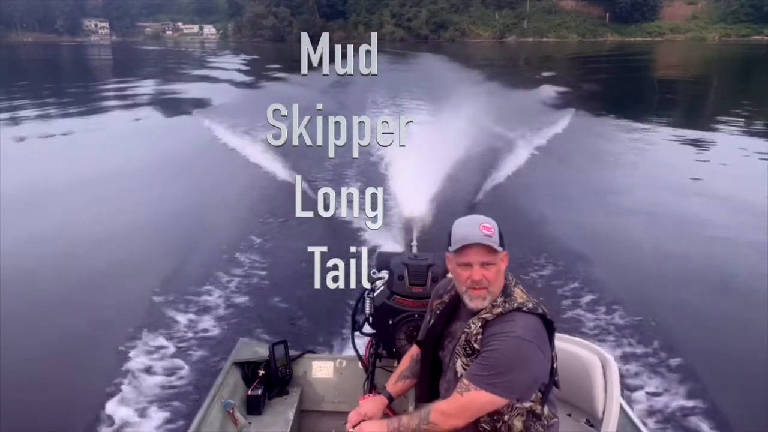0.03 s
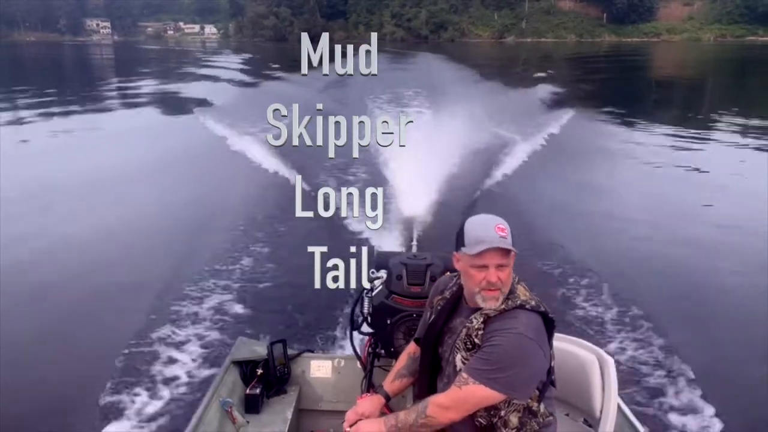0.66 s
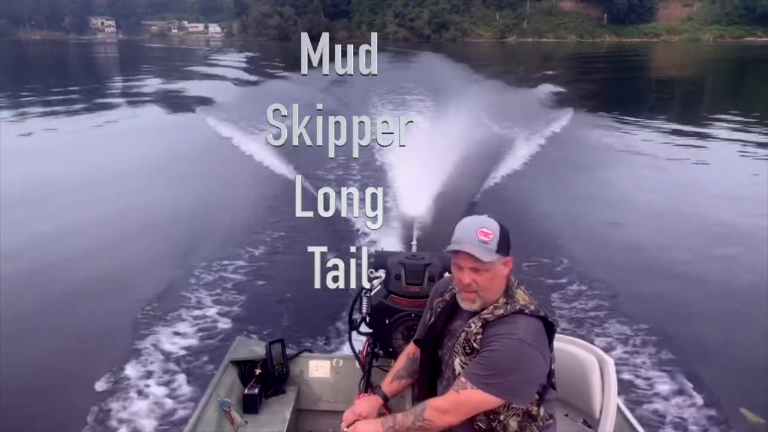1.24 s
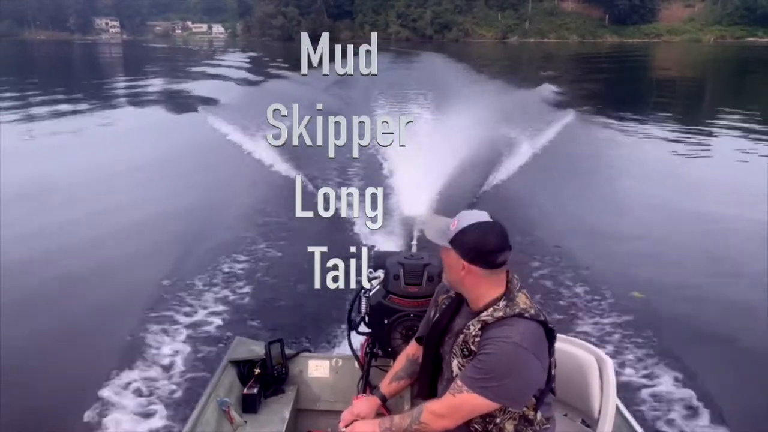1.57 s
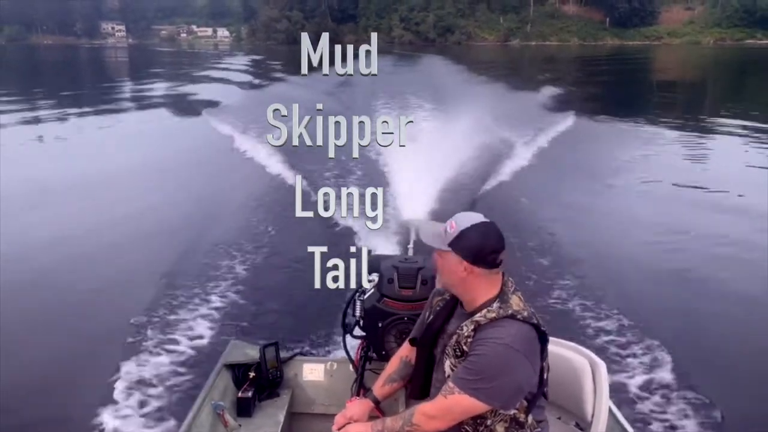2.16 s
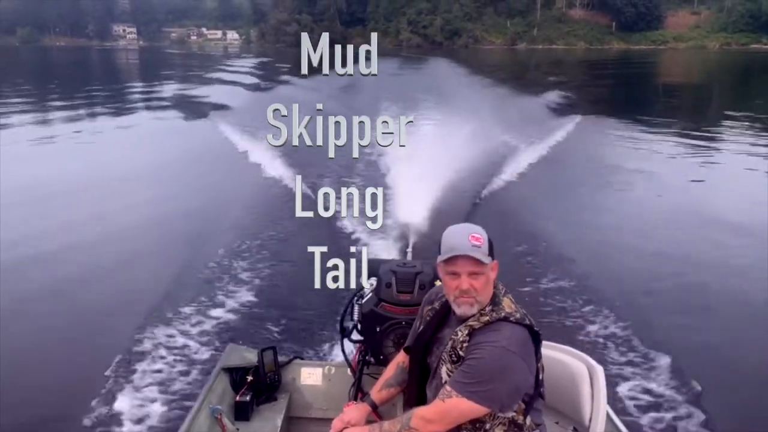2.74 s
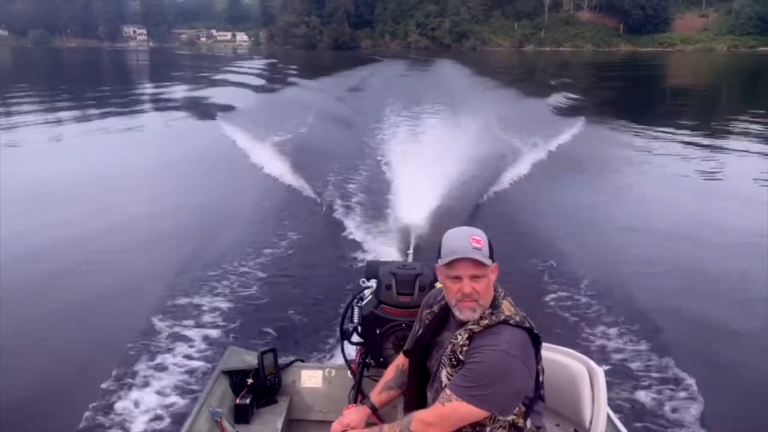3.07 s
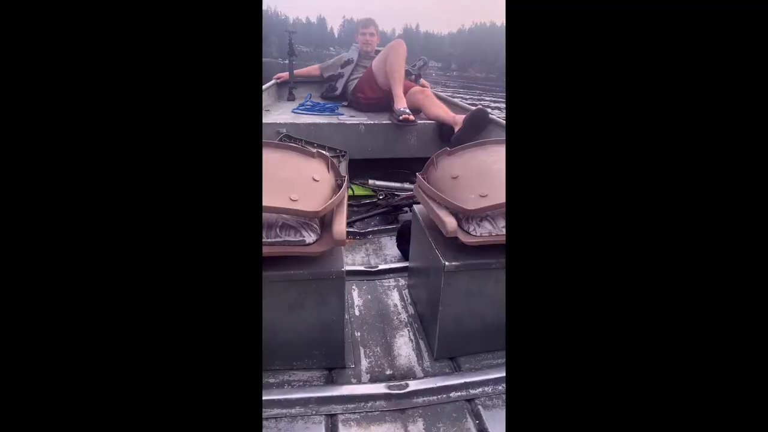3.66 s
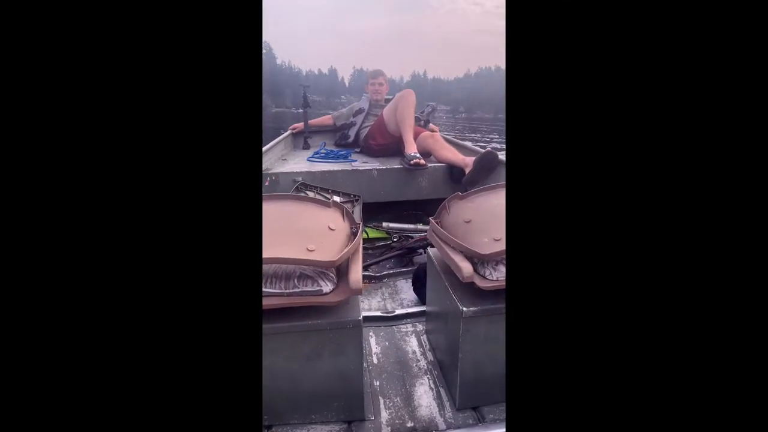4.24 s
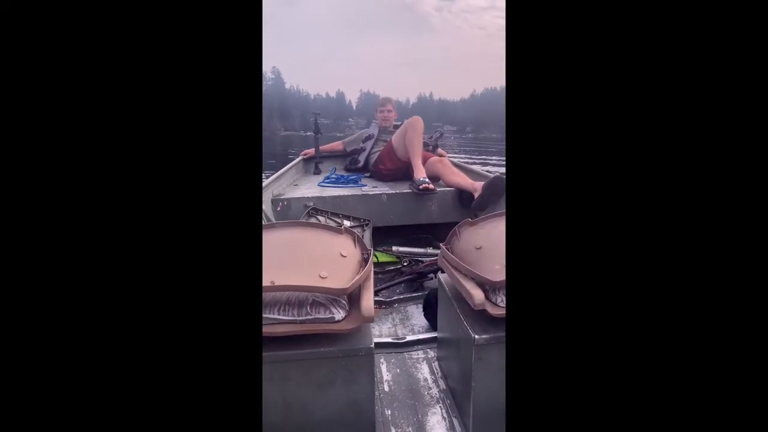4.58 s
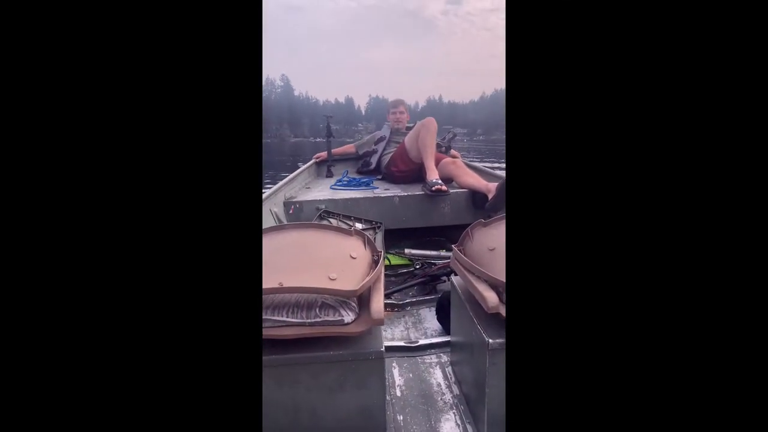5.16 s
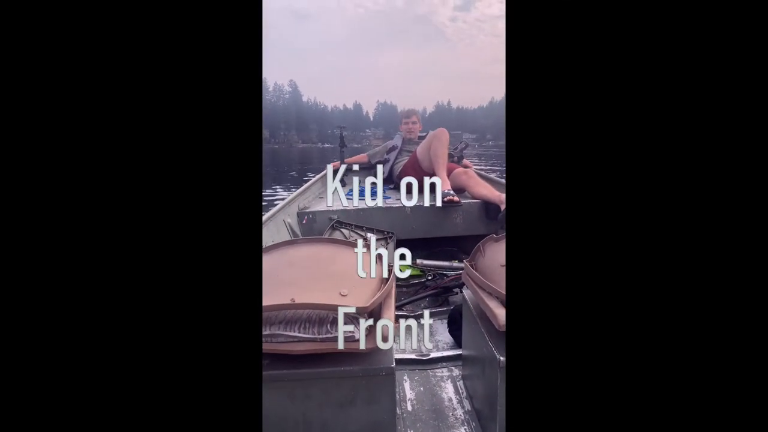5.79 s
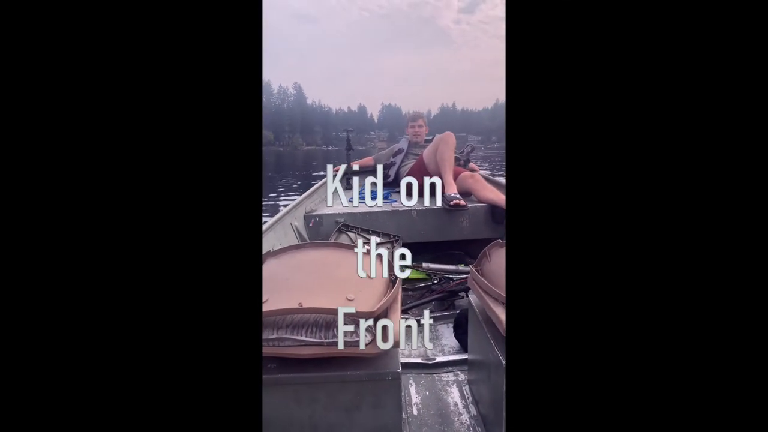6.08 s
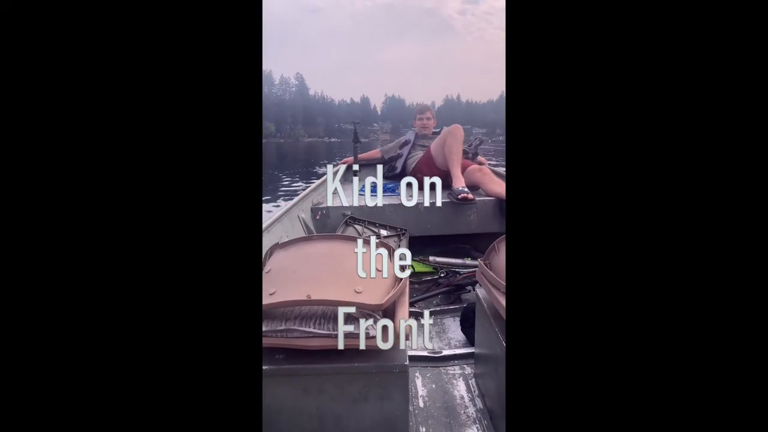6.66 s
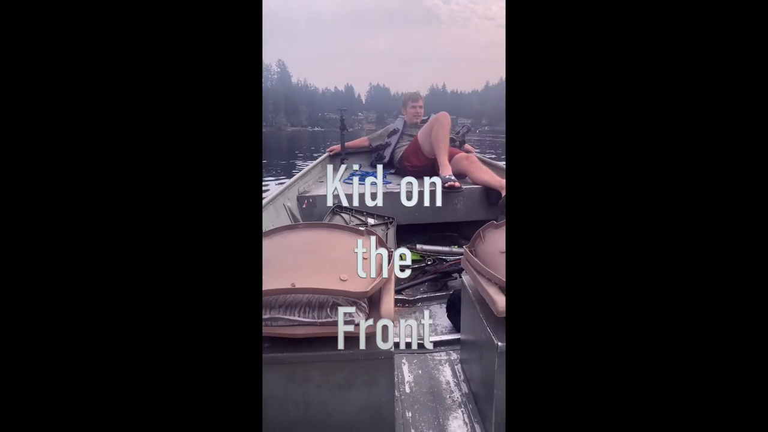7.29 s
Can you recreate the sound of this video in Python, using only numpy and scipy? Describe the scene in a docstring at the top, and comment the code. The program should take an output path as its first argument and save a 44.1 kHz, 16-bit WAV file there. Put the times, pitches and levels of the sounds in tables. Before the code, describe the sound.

A small petrol motor pushes an aluminium boat across a lake, heard from on board. From the start it runs at a steady speed, with a low exhaust drone, metallic clatter, a faint shaft whine and rushing spray. At about 3.3 seconds the hull gives one sharp thump; the level dips briefly and a faint tick follows. At about 3.6 seconds the sound switches abruptly to a louder, faster run, higher in pitch and with a brighter hiss, settling slightly after half a second. Ripples slap the hull dully at uneven intervals, the propeller shaft knocks in its tube and the roar churns, swelling and sinking. A hull panel booms, most strongly around 6.2 and 7.2 seconds. Between 6.5 and 6.9 seconds a loose fitting gives three faint, high squeaks. The motor runs on until the end, at about 7.4 seconds.

```python
"""A long-tail mud motor drives a small aluminium boat across a lake. First the microphone faces aft:
spray rushes, the engine clatters and the exhaust drones on multiples of the cycle rate (one cycle is
two turns of the crank). Near 3.3 s the hull thumps, the level dips briefly and a faint tick follows.
Near 3.6 s the scene cuts to a louder, faster run, facing the bow: ripples slap the hull, a panel booms,
the shaft knocks in its tube and the roar churns. Towards the end a loose fitting squeaks."""
import sys
import numpy as np
from scipy import signal
from scipy.fft import rfft, irfft, next_fast_len
from scipy.io import wavfile
from scipy.ndimage import uniform_filter1d, map_coordinates

SR = 44100
rng = np.random.default_rng(int(sys.argv[2]) if len(sys.argv) > 2 else 0)


def generate_wav(sig):
    """Save sig (samples, or channels by samples) to the path in sys.argv[1] as 16-bit PCM at SR."""
    pcm = np.round(np.clip(np.atleast_2d(sig).T, -1, 1) * 32767).astype(np.int16)
    wavfile.write(sys.argv[1], SR, pcm)


N = 327219
T = np.arange(N) / SR
THUMP_S, CUT_S = 3.284, 3.585


def amp(db):
    """Amplitude ratio: a factor of ten for every 20 dB."""
    return 10 ** (np.asarray(db) / 20)

def unit(x):
    """Normalisation to an rms of 1."""
    return x / np.sqrt(np.mean(x ** 2) + 1e-20)

def along(rows, hz):
    """Interpolation of a table's columns on a logarithmic frequency axis."""
    row_hz, *columns = np.transpose(rows)
    return [np.interp(np.log(hz + 1), np.log(row_hz + 1), column) for column in columns]

def contour(rows):
    """Linear interpolation of (time [s], level [dB]) rows at every sample."""
    return np.interp(T, *np.transpose(rows))

def wobble(rate):
    """Smooth random modulation: a spline through `rate` Gaussian knots a second."""
    coarse = T[::64]
    knots = rng.standard_normal(int(T[-1] * rate) + 4)
    return np.interp(T, coarse, map_coordinates(knots, [coarse * rate]))

def filtered(x, response):
    """Linear filtering: the spectrum is multiplied by a complex frequency response."""
    size = next_fast_len(N + SR // 4, real=True)
    return irfft(rfft(x, size) * response(np.fft.rfftfreq(size, 1 / SR)), size)[..., :N]

def lowpass(x, edge_hz, order=8):
    """Zero-phase low-pass filtering, with half amplitude at the edge."""
    return filtered(x, lambda hz: 1 / (1 + (hz / edge_hz) ** order))

def ringing(x, modes):
    """Modal superposition: x drives damped resonances of alternating polarity."""
    return filtered(x, lambda hz: sum(
        (-1) ** k * amp(db) * 1j * hz * width / (centre ** 2 - hz ** 2 + 1j * hz * width)
        for k, (centre, width, db) in enumerate(modes)))

def patchy(x, depth_db):
    """Bandwise amplitude modulation, in patches some 250 Hz wide and 60 ms long."""
    spectra = signal.stft(x, nperseg=512)[2]
    field = uniform_filter1d(rng.standard_normal(spectra.shape), size=3, axis=1)
    field = uniform_filter1d(field, size=11, axis=2)
    return signal.istft(spectra * unit(amp(depth_db * unit(field))), nperseg=512)[1][:, :N]

def knocks(cycle, places, jitter_s, scatter_db=2.0):
    """A quasi-periodic impulse train: blows recur each cycle, a little off in time and size."""
    place, db = np.transpose(places)
    due = np.arange(int(cycle[-1]) + 1)[:, None] + place
    late, size = rng.standard_normal((2, *due.shape))
    sample = (np.interp(due, cycle, T, right=T[-1] + 1) + jitter_s * late) * SR
    heard = (sample > 0) & (sample < N - 1)
    return unit(np.bincount(np.rint(sample[heard]).astype(int), amp(db + scatter_db * size)[heard], N))

def wash(cycle, spectrum, rattle_share, jitter_s, throb_db, flutter_db):
    """Incoherent sources add in power: two streams of water rush and rattle, swelling once a cycle."""
    # loose parts are strongest in mid-spectrum: (frequency [Hz], power weight [0-1])
    weights = [(150, 0.094), (450, 0.94), (2800, 0.72), (7000, 0.56)]
    share = lambda hz: np.clip(rattle_share * along(weights, hz)[0], 0, 1)
    loose_parts = lambda count: np.column_stack([rng.random(count), rng.normal(0, 1.95, count)])
    blows = np.array([knocks(cycle, loose_parts(count=56), jitter_s) for _ in range(2)])
    rattle = filtered(blows, lambda hz: np.sqrt(share(hz)))
    rush = filtered(rng.standard_normal((2, N)), lambda hz: np.sqrt(1 - share(hz)))
    firing = np.cos(np.pi * cycle) ** 8
    swell = unit(amp(throb_db * firing + flutter_db * wobble(90)))
    return filtered((rattle + rush) * swell, lambda hz: amp(along(spectrum, hz)[0]) * np.sqrt(SR / 2))

def hull_echoes(x, strength, count=12, reach_s=.012):
    """Comb filtering: the bare aluminium sides return weak early copies of each stream."""
    taps = np.zeros((2, int(SR * reach_s) + 100))
    for row in taps:
        row[rng.integers(30, len(row), count)] = strength * rng.choice([-1, 1], count) / np.sqrt(count)
    taps[:, 0] = 1
    return signal.fftconvolve(x, taps / np.linalg.norm(taps, axis=1, keepdims=True), axes=1)[:, :N]

def clatter(noise, echo, lump_db):
    """Short waves reflect from the boat's sides, while the middle band comes in lumps."""
    deep, rumble = lowpass(noise, 1000), lowpass(noise, 350)
    return rumble + patchy(deep - rumble, lump_db) + hull_echoes(noise - deep, echo)

def tick(start, db):
    """A short transient has a broad spectrum: a faint, bright tick."""
    age = np.maximum(T - start, 0)
    return amp(db) * rng.standard_normal(N) * np.exp(-age / .0004) * (age > 0)

def squeaks(pitch_hz, rough_rad):
    """A loose metal fitting squeaks on one note, roughened by phase modulation."""
    # squeaks: (time [s], duration [s], level [dB])
    events = [(6.55, .04, -50), (6.638, 0.045, -45.5), (6.822, 0.033, -47)]
    swell = sum(amp(db) * np.exp(-(2 * (T - at) / length) ** 2) for at, length, db in events)
    return np.sqrt(2) * swell * np.cos(2 * np.pi * pitch_hz * T + rough_rad * wobble(110))

def slaps(rise_s, left_db):
    """Resonant response: each ripple that slaps the bow makes the hull's bottom rumble briefly."""
    # ripples: (time [s], level [dB], share of power in antiphase at the ports [ratio])
    ripples = [(3.665, -40, .1), (3.785, -39, 0.2), (3.935, -44, .4), (4.255, -42, 0.2), (4.385, -40, 0.05),
               (4.535, -36, .25), (4.665, -40, 0.9), (4.945, -41, 0.3), (5.165, -41, 0), (5.3, -43, 0.4),
               (5.505, -48, 0.2), (5.755, -37, .8), (6.155, -41, 0.8), (6.625, -41, 1.04), (6.985, -42, 1),
               (7.115, -38, 1.1)]
    # modes of the hull's bottom: (frequency [Hz], bandwidth [Hz], level [dB])
    bottom_modes = [(310, 45, 0), (359, 35, 0.5), (530, 100, -11.5)]
    swell = np.zeros((2, N))
    for start, db, spread in ripples:
        age = np.maximum(T - start, 0) / rise_s
        apart = np.clip(spread, 0, 1)
        swell += amp(db) * np.sqrt([[1 - apart], [apart]]) * age * np.exp(1 - age)
    bottom = lowpass(ringing(rng.standard_normal((2, N)), bottom_modes), 800, order=4)
    shared, opposed = swell * unit(bottom)
    return np.array([shared + opposed, shared - opposed]) * amp(np.array([[.5], [-.5]]) * left_db)

def thump(start, db, crack_db, chirp_hz, boom_hz, fall_s, rise_s, length_s):
    """Dispersion of bending waves in the hull: a crack, high notes first, then a few deep swings."""
    age = np.maximum(T - start, 0)
    phase = 2 * np.pi * (boom_hz * age + chirp_hz * fall_s * (1 - np.exp(-age / fall_s)))
    left_lead = 1.45 + 1.3 * np.exp(-age / .011)
    envelope = (1 - np.exp(-(age / rise_s) ** 2)) * np.exp(-(age / length_s) ** 4)
    bending = envelope * np.cos(phase + np.array([[.5], [-.5]]) * left_lead)
    crack = rng.standard_normal(N) * (1 - np.exp(-age / .0006)) * np.exp(-age / .002)
    blow = amp(db) * bending + amp(crack_db) * crack
    return filtered(blow, lambda hz: 1 / np.sqrt(1 + (hz / 2800) ** 6 + (hz / 6000) ** 20))

def whine(cycle, orders, waver, slip_rad, beat_db, uneven_db, chatter_db):
    """The shaft tube sings on high harmonics, amplitude-modulated once and five times a cycle."""
    beat, chatter = np.cos(2 * np.pi * cycle), np.cos(2 * np.pi * 5 * cycle)
    swell = unit(amp(beat_db * beat + chatter_db * chatter + uneven_db * wobble(80)))
    return swell * drone(cycle, orders, waver, slip_rad)

def tube_knocks(cycle, jitter_s):
    """Impact excitation: at speed the shaft strikes its tube, which rings briefly."""
    # blows of the shaft: (place in the cycle [0-1], level [dB])
    blows = [(.42, 0), (.57, -1), (.82, -8), (.02, -6)]
    # mode of the tube: (frequency [Hz], bandwidth [Hz], level [dB])
    tube_mode = [(975, 85, 0)]
    return unit(ringing(knocks(cycle, blows, jitter_s, scatter_db=2.3), tube_mode))

def valves(cycle, places, modes, knock_share, jitter_s, chug_db):
    """Forced vibration: valve knocks and a chugging shake ring the engine's metal, in two streams."""
    blows = np.array([knocks(cycle, places, jitter_s) for _ in range(2)])
    shake = rng.standard_normal((2, N)) * amp(chug_db * np.cos(2 * np.pi * cycle) + 1.26 * wobble(12))
    force = np.sqrt(knock_share) * blows + np.sqrt(1 - knock_share) * unit(shake)
    return ringing(force, modes) * np.sqrt(SR / 2)

def engine_cycles(mean_hz, swing_hz, period_s, fastest_s, uneven_hz):
    """The cycle count is the integral of speed, which hunts at held throttle and fires unevenly."""
    hunt = swing_hz * np.cos(2 * np.pi * (T - fastest_s) / period_s)
    return np.cumsum(mean_hz + hunt + uneven_hz * wobble(10)) / SR

def drone(cycle, orders, waver, slip_rad):
    """A harmonic series on the cycle rate; uneven firing varies each order's strength and phase."""
    hum = np.zeros(N)
    for order, db in orders:
        phase = 2 * np.pi * (order * cycle + rng.random()) + slip_rad * wobble(7)
        hum += np.sqrt(2) * amp(db) * (1 + waver * wobble(6)) * np.cos(phase)
    return hum

def at_ports(hum, noise, ports):
    """Partial coherence: the two microphone ports share one stream and hear the other in antiphase."""
    def split(hz):
        angle = np.arccos(np.clip(along(ports, hz)[0], 0, 1)) / 2
        return np.array([np.cos(angle), np.sin(angle)])
    def lead(hz):
        _, phase, balance_db = along(ports, hz)
        left = np.exp(.5j * phase) * amp(balance_db / 2)
        return np.array([left, 1 / left])
    direct, diffuse = filtered(noise, split)
    return filtered(np.array([hum + direct + diffuse, hum + direct - diffuse]), lead)

def swaying(boat, low_db, high_db, exhaust_db, hull_db, clatter_db):
    """Slow amplitude modulation: exhaust, hull and clatter bands sway about the low and high levels."""
    bass, body = lowpass(boat, 145), lowpass(boat, 430)
    sway = lambda depth_db: amp(depth_db * wobble(4.04))
    low = sway(exhaust_db) * bass + sway(hull_db) * (body - bass)
    return amp(low_db) * low + amp(high_db) * sway(clatter_db) * (boat - body)

def dip(depth_db, sink_s, recover_s):
    """Exponential recovery: the level [dB] sinks just after the thump and creeps back."""
    age = np.maximum(T - THUMP_S, 0)
    return depth_db * np.minimum(age / sink_s, 1) * np.exp(-np.maximum(age - sink_s, 0) / recover_s)

def churn(boat, low_hz, high_hz):
    """Modulation of the in-phase part: the band of roar that both ports share swells and sinks."""
    # swell of the roar: (time [s], level [dB])
    roar_levels = [(3.6, -1), (4.1, 1.5), (4.34, -2.5), (4.49, 2), (4.64, -6), (4.74, 0.5), (4.9, -1.5),
                   (5.2, .5), (5.55, 0.5), (5.88, -2), (6.0, 1), (6.24, -1.5), (6.42, 2), (6.62, -1),
                   (6.72, 2.5), (6.88, 1.5), (7.02, -2), (7.17, -9), (7.22, 1), (7.42, 1)]
    shared = boat.mean(axis=0)
    roar = lowpass(shared, high_hz, order=20) - lowpass(shared, low_hz, order=10)
    return boat + (amp(contour(roar_levels)) - 1) * roar

def facing_aft():
    """Superposition at a cruise: drone, whine, wash and valves follow one cycle, with little top end."""
    # harmonics of exhaust and hull, and of the shaft tube: (order [x cycle rate], level [dB])
    exhaust_orders = [(2, -56), (3, -58), (4, -48.5), (5, -39.8), (8, -50), (9, -57), (10, -46.3),
                      (11, -57), (12, -60), (13, -57.5), (14, -50.3), (16, -58), (17, -61), (18, -62),
                      (19, -58)]
    shaft_orders = [(26, -64), (32, -66), (36, -65), (46, -58.5), (47, -64), (50, -67)]
    # hull rumble, clatter and spray: (frequency [Hz], spectral level [dB/Hz])
    wash_spectrum = [(20, -90), (45, -63), (70, -58.5), (105, -66), (200, -65.5), (300, -70), (400, -70.5),
                     (600, -75.5), (850, -81), (1000, -81), (1900, -87.5), (3100, -87.5), (4300, -96.5),
                     (5100, -94.5), (5900, -90.5), (6600, -91), (7800, -97), (10000, -123.1)]
    # valve knocks: (place in the cycle [0-1], level [dB])
    valve_blows = [(.02, 0), (.26, 0), (0.582, 5), (.72, -3), (.95, -0.5)]
    # modes of engine covers and shaft tube: (frequency [Hz], bandwidth [Hz], peak level [dB/Hz])
    metal_modes = [(726, 25, -77.5), (946, 67, -75.5), (1470, 183, -82), (2120, 60, -87.5),
                   (2736, 130, -81.5), (3024, 70, -81), (3185, 65, -80), (3346, 70, -83),
                   (3580, 100, -89.5), (4390, 110, -89), (5450, 140, -91), (6390, 130, -93)]
    # swell of the metallic rasp: (time [s], level [dB])
    rasp_levels = [(0, 0), (.85, -0.5), (1.08, 0.2), (1.36, 1), (1.65, -1), (3.6, .3)]
    # field at the ports: (frequency [Hz], coherence [0-1], left lead [rad], left minus right [dB])
    ports = [(45, 0.4, -1.5, 1.5), (68, 0.83, -3, 0.5), (82.5, 0.4, -1, -1), (100, .9, 0.1, -1.5),
             (135, 0.5, 0.1, -3), (163, .4, 0, -7), (200, 0.85, 0.54, -4), (402, 0.7, 0.3, -1),
             (603, 0.65, 1.0, -5), (940, 0.89, 0.36, -2), (1390, 0.5, -1.4, -1.5), (1900, 0.05, 0.5, -0.5),
             (2310, 0, 2.06, 0.8), (3720, 0, 4, 1), (5130, 0.2, 3, 1), (6070, 0.6, 6, 0.5),
             (6900, 0.2, 7.5, 0), (8900, 0.2, 4, -3)]
    cycle = engine_cycles(mean_hz=20.1, swing_hz=.06, period_s=2.5, fastest_s=2.5, uneven_hz=.04)
    hum = amp(-1.56) * drone(cycle, exhaust_orders, waver=.092, slip_rad=.1)
    shaft = whine(cycle, shaft_orders, waver=.3, slip_rad=.35, beat_db=3, uneven_db=3, chatter_db=.5)
    rush = wash(cycle, wash_spectrum, rattle_share=.26, jitter_s=.00009, throb_db=2, flutter_db=1.3)
    rasp = amp(contour(rasp_levels) + .83 * wobble(36))
    metal = rasp * valves(cycle, valve_blows, metal_modes, knock_share=.24, jitter_s=.00018, chug_db=1)
    noise = clatter(amp(.08) * rush, echo=.3, lump_db=1) + patchy(metal, depth_db=2.3)
    boat = at_ports(hum + amp(-1) * shaft, noise, ports)
    dip_db = dip(depth_db=-8, sink_s=.012, recover_s=.16)
    boat = swaying(boat, low_db=dip_db, high_db=.54 * dip_db,
                   exhaust_db=.14, hull_db=-.37, clatter_db=.37)
    return lowpass(boat, 9500, order=20)

def facing_bow():
    """More throttle raises the fundamental; a hull panel booms on order 8 and spray hisses brightly."""
    # harmonics of exhaust and hull, and of the shaft tube: (order [x cycle rate], level [dB])
    exhaust_orders = [(2, -39.7), (3, -38.3), (4, -37.5), (5, -45), (6, -44.5), (7, -50), (9, -47.2),
                      (10, -52), (11, -57), (12, -52), (13, -49.5), (14, -53), (15, -52), (16, -59)]
    shaft_orders = [(24, -66), (28, -56.5), (32, -62), (36, -57), (38, -63), (44, -59), (52, -61.5),
                    (56, -59.5), (60, -59.5), (64, -64)]
    # swell of the booming panel: (time [s], level [dB])
    boom_levels = [(3.6, -37), (4.57, -41), (4.64, -69), (4.77, -39), (6.01, -43), (6.23, -32.5),
                   (6.59, -44.5), (6.98, -45), (7.2, -34.5), (7.42, -47)]
    # hull rumble, clatter and spray: (frequency [Hz], spectral level [dB/Hz])
    wash_spectrum = [(20, -82), (50, -57), (100, -59), (200, -64), (350, -66), (500, -70.5), (800, -74.5),
                     (980, -74), (1400, -76), (2000, -80), (2900, -84), (4200, -88), (4900, -99),
                     (6000, -91.5), (10500, -94), (15500, -102.2)]
    # valve knocks: (place in the cycle [0-1], level [dB])
    valve_blows = [(.17, -2), (.45, -2.5), (.58, -2.5), (.8, 1), (.87, -11)]
    # modes of engine covers and shaft tube: (frequency [Hz], bandwidth [Hz], peak level [dB/Hz])
    metal_modes = [(687, 23, -67), (974, 90, -71.5), (1257, 17, -74), (1356, 25, -72), (1467, 18, -73.5),
                   (1850, 28, -82), (2140, 23, -89), (2730, 31, -79), (2910, 110, -81.5), (3110, 67, -86),
                   (5650, 230, -86.5)]
    # field at the ports: (frequency [Hz], coherence [0-1], left lead [rad], left minus right [dB])
    ports = [(50, .9, 0, 0), (100, .85, 0, 0), (200, .8, -.1, -2.3), (350, .7, -.2, -3.5),
             (500, .36, -.7, -1), (600, .4, -1.3, -2), (680, .5, -2.5, -3.5), (780, .7, -2.5, -2),
             (876, .3, -1.5, -3.5), (925, .6, -1.6, -2), (972, .8, -2.4, -2), (1360, .75, -2.1, 0),
             (1460, .75, -2.9, 0), (2000, .6, -3.8, .4), (4000, .7, -4.2, .3), (4800, .85, -3.2, 0),
             (6800, .85, 0, 0), (9000, .85, 3.1, 0), (11000, .85, 6.3, 0), (13200, .85, 9.4, 0),
             (15200, .85, 12.6, 0)]
    cycle = engine_cycles(mean_hz=24.29, swing_hz=.08, period_s=.94, fastest_s=4.42, uneven_hz=.06)
    hum = drone(cycle, exhaust_orders, waver=.2, slip_rad=.22)
    boom = amp(contour(boom_levels)) * drone(cycle, [(8, -1.2)], waver=.22, slip_rad=.3)
    shaft = whine(cycle, shaft_orders, waver=.25, slip_rad=.24, beat_db=1, uneven_db=3, chatter_db=3)
    tube = amp(-45.5 + 1.8 * wobble(9)) * tube_knocks(cycle, jitter_s=.00014)
    rush = wash(cycle, wash_spectrum, rattle_share=.17, jitter_s=.00008, throb_db=.05, flutter_db=1.2)
    rasp = amp(-.9 + 1.3 * wobble(36))
    metal = rasp * valves(cycle, valve_blows, metal_modes, knock_share=.19, jitter_s=.00012, chug_db=2.5)
    tones = amp(-.5) * (hum + shaft) + boom + tube + squeaks(pitch_hz=2900, rough_rad=.6)
    noise = clatter(rush, echo=.44, lump_db=2.5) + patchy(metal, depth_db=2.5)
    hold_s, release_s = .403, .065  # the run opens louder, then settles
    opening_db = np.clip(1 - (T - CUT_S - hold_s) / release_s, 0, 1)
    boat = swaying(at_ports(tones, noise, ports), low_db=opening_db, high_db=3 * opening_db,
                   exhaust_db=-.5, hull_db=1, clatter_db=.18)
    return churn(boat + slaps(rise_s=.022, left_db=1.5), low_hz=400, high_hz=850)

def scene():
    """A crossfade of a few milliseconds is heard as a hard cut from aft to bow."""
    bow_share = np.clip((T - CUT_S) / .0077 + .5, 0, 1)
    bump = thump(start=THUMP_S, db=-23.5, crack_db=-22, chirp_hz=3400, boom_hz=100,
                 fall_s=.0022, rise_s=.0018, length_s=.031)
    aft = facing_aft() + bump + tick(start=3.4605, db=-45)
    return (1 - bow_share) * aft + bow_share * facing_bow()

def record(dry):
    """Band limiting: an ideal low-pass filter removes the highest treble."""
    return filtered(dry, lambda hz: hz < 15750)


dry = scene()
out = record(dry)
generate_wav(out)
```